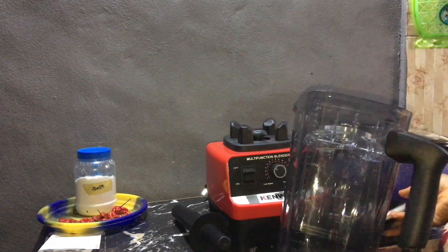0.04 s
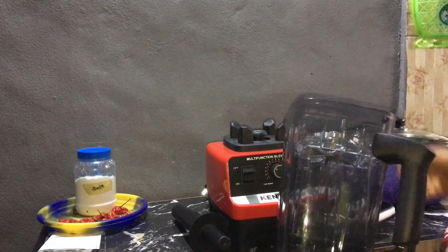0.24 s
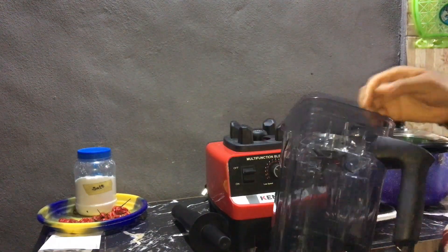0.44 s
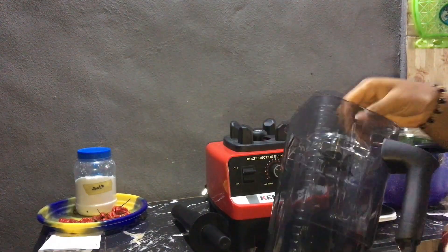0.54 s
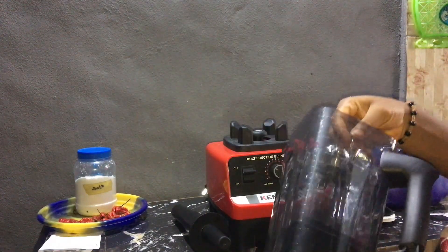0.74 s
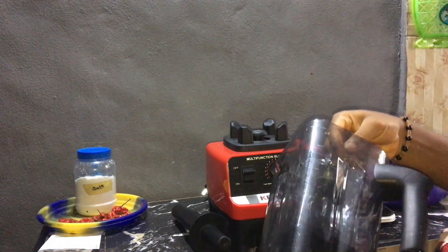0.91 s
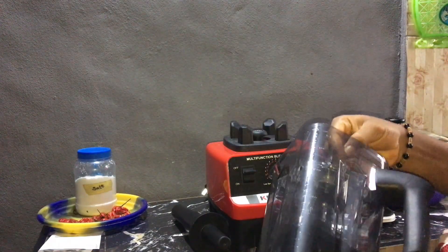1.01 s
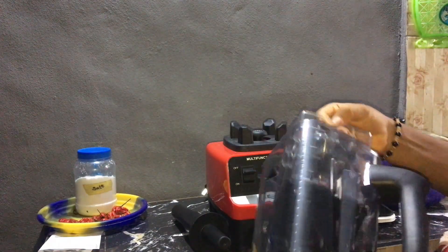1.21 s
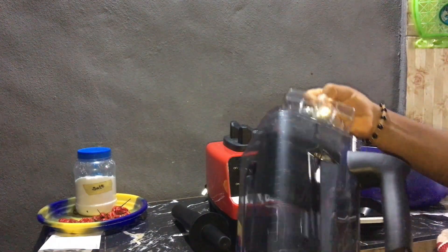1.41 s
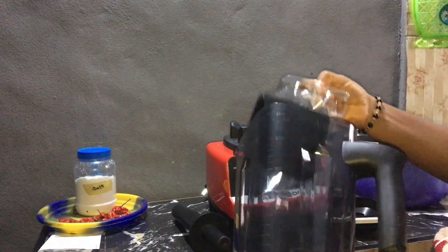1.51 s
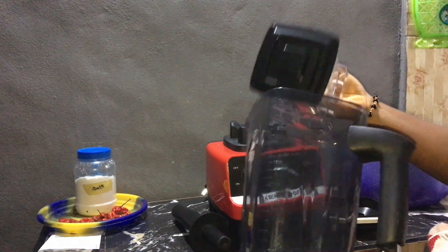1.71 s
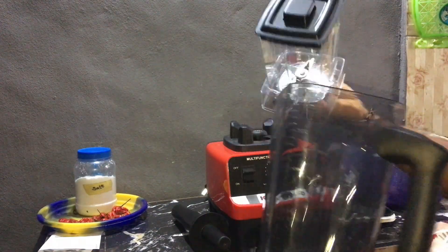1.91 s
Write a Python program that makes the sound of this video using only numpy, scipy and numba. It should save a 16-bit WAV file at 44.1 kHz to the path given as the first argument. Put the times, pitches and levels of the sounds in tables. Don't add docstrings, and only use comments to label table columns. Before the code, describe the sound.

A plastic blender jug is tapped and rubbed, then its lid snaps off and bumps the rim

```python
import sys
import numpy as np
from scipy import signal
from scipy.fft import rfft, irfft
from scipy.io import wavfile
from scipy.ndimage import uniform_filter1d, minimum_filter1d
from numba import njit

SR = 44100
rng = np.random.default_rng(int(sys.argv[2]) if len(sys.argv) > 2 else 0)


def persist_wave(psi):
    counts = np.round(np.clip(psi, -1, 1) * 32767).astype(np.int16)
    wavfile.write(sys.argv[1], SR, np.atleast_2d(counts).T)


def how_loud(loudness_db):
    steps = np.asarray(loudness_db, float) / 20
    return 10 ** steps


N = 85995
LEAD_IN = 8820
TIME = (np.arange(N + LEAD_IN) - LEAD_IN) / SR


def rms_one(x):
    return x / np.sqrt(np.mean(x ** 2) + 1e-20)


def at_hz(points, hz):
    table_hz, value = np.transpose(points)
    return np.interp(np.log(hz), np.log(table_hz), value)


def coloured(spectrum, size):
    hz = np.maximum(np.fft.rfftfreq(size, 1 / SR), 1)
    octaves_below = np.maximum(np.log2(spectrum[0][0] / hz), 0)
    white = rfft(rng.standard_normal(size))
    return rms_one(irfft(white * how_loud(at_hz(spectrum, hz) - 10 * octaves_below), size))


def dulled(x, hz):
    return signal.sosfilt(signal.butter(2, hz, fs=SR, output="sos"), x)


def ring(clicks, hz, t60):
    r, w = how_loud(-60 / (t60 * SR)), 2 * np.pi * hz / SR
    return signal.lfilter([0, np.sin(w)], [1, -2 * r * np.cos(w), r * r], clicks + 1e-18)


# (frequency [Hz], level [dB per Hz])
PLASTIC_CRACK = [(500, 14.5), (2000, 4), (4000, -3), (8000, -17.5), (16000, -48)]


def blows(events, high, low, rattle, high_db, low_db):
    crack_db, crack_s, rattle_s = 5, 0.0032, 0.015
    spread_db, detune = 2.5, .008
    focus_db_per_octave, thump_rise_s = 32, .0035
    out, crack = np.zeros(N + LEAD_IN + SR), coloured(PLASTIC_CRACK, size=SR)
    t = np.arange(SR // 2) / SR
    for s, click_db, bright_hz, thump_db, centre_hz in events:
        level_luck, pitch_luck = rng.standard_normal((2, 14))
        start = int(rng.random() * len(t))
        click = how_loud(crack_db) * crack[start:start + len(t)] * np.exp(-t / crack_s) / 2
        push = rattle * rng.standard_normal(len(t)) * np.exp(-t / rattle_s) / np.sqrt(rattle_s * SR / 2)
        push[0] = 1
        for (hz, db, t60), z, d in zip(high, level_luck, pitch_luck):
            click += how_loud(high_db + db + spread_db * z) * ring(push, hz * (1 + detune * d), t60)
        click = dulled(click, min(bright_hz, 15000))
        thump = np.zeros(len(t))
        for (hz, db, t60), phase in zip(low, pitch_luck):
            mode_db = low_db + db - focus_db_per_octave * abs(np.log2(hz / centre_hz))
            thump += how_loud(mode_db - 60 * t / t60) * np.sin(2 * np.pi * hz * t + phase)
        thump *= (1 - np.exp(-t / thump_rise_s)) ** 2
        i = int(s * SR) + LEAD_IN
        out[i:i + len(t)] += how_loud(click_db) * click + how_loud(thump_db) * thump
    return out[:N + LEAD_IN]


# (time [s], click level [dB], brightness [Hz], thump level [dB], thump centre [Hz])
EARLIER_BLOWS = [
    (-.1, -14.5, 6900, -25, 320),
    (-.02, -29, 5040, -34, 120),
    (.105, -32.5, 5100, -42, 400),
]
# (frequency [Hz], level [dB], t60 [s])
CUTTER_MODES = [(870, -11, 0.036), (1545, -24, 0.026), (2200, -6.5, 0.037), (2300, -4, 0.087),
                (2368, -2, 0.16), (5850, -6, 0.042)]
# (frequency [Hz], level [dB], t60 [s])
CLOSED_LOW_MODES = [(194, -18, 0.05), (221, -1, 0.057), (318, -13, 0.14), (410, -3, 0.05),
                    (476, -14.5, 0.089), (593, -9, 0.037)]


def earlier_clatter():
    return blows(EARLIER_BLOWS, CUTTER_MODES, CLOSED_LOW_MODES, rattle=1.0, high_db=-2.5, low_db=3)


# (start [s], length [s], level [dB], brightness [Hz])
DRAGS = [
    (-.1, 0.26, -35.5, 12000),
    (0.081, 0.19, -41, 12000),
    (0.583, 0.27, -34, 4000),
    (0.753, 0.18, -29, 4000),
    (1.093, 0.14, -24.5, 15000),
    (1.323, 0.11, -22.5, 3040),
    (1.41, 0.18, -34, 4000),
]


def scrapes():
    out = np.zeros(N + LEAD_IN)
    for s, length, db, bright_hz in DRAGS:
        grit = coloured(PLASTIC_CRACK, size=N + LEAD_IN + 1)[:N + LEAD_IN]
        grit = dulled(grit, min(bright_hz, 15000))
        progress = np.clip((TIME - s) / length, 0, 1)
        out += how_loud(db) * grit * np.sin(np.pi * progress ** .5) ** 2
    return out


@njit
def moving_resonance(x, hz, r, sr):
    y = np.zeros(len(x))
    for i in range(2, len(x)):
        y[i] = x[i] - x[i - 2] + 2 * r * np.cos(2 * np.pi * hz[i] / sr) * y[i - 1] - r * r * y[i - 2]
    return y


# (time [s], level [dB], column pitch [Hz])
GRIP_PATH = [(0, -28, 221), (.1, -40.5, 221), (.22, -30.5, 221), (0.269, -24, 221), (.36, -34, 221),
             (.5, -24.5, 221), (.56, -20.5, 221), (.64, -33.5, 221), (0.791, -19.5, 221), (0.949, -43, 221),
             (1.09, -46, 242), (1.13, -20.5, 262), (1.302, -25.5, 262), (1.38, -15.5, 267.3),
             (1.52, -33.5, 298), (1.6, -31, 280.6), (1.7, -30.5, 307), (1.95, -51.5, 283)]
# (frequency [Hz], level [dB], t60 [s])
WALL_MODES = [(915, -2, 0.026), (1143, -1, 0.022), (1270, -11.5, 0.021), (1570, -7.5, 0.019),
              (1820, -2.5, 0.013), (2134, -1, 0.014), (2390, -0.5, 0.016), (2975, -3.5, 0.018),
              (3226, -5, 0.02), (4200, -21, .006), (6330, -8.5, .01)]
# (frequency [Hz], level [dB], t60 [s])
OPEN_LOW_MODES = [(262, 0, 0.11), (298, 2.5, 0.15), (340, 1, 0.12), (389.7, 3.5, 0.17), (500, -6, 0.16),
                  (609, -8, .1), (666, -5, 0.18)]


def rubbing():
    clicks_per_s, soft_hz, column_width_hz, even_s = 2500, 2500, 9, .02
    body_db, wall_db = -5.5, -17.5
    s, db, hz = np.transpose(GRIP_PATH)
    slips = (rng.random(len(TIME)) < clicks_per_s / SR) * rng.standard_normal(len(TIME))
    slips = slips * how_loud(0.92 * np.minimum(rng.exponential(1, len(TIME)), 3))
    slips = dulled(slips, soft_hz)
    pitch, r = np.interp(TIME, s, hz), np.exp(-np.pi * column_width_hz / SR)
    column = moving_resonance(slips, pitch, r, SR)
    column = rms_one(moving_resonance(column, pitch, r ** 4, SR))
    swell = np.sqrt(uniform_filter1d(column ** 2, size=int(even_s * SR)) + 1e-9)
    column = rms_one(column / (swell + 0.12))

    def stirred(modes):
        return rms_one(sum(how_loud(d) * ring(slips, f, t60) for f, d, t60 in modes))

    opened = TIME > LOOSENING[0][0]
    body = np.where(opened, stirred(OPEN_LOW_MODES), stirred(CLOSED_LOW_MODES))
    mix = column + how_loud(body_db) * body + how_loud(wall_db) * stirred(WALL_MODES)
    return how_loud(np.interp(TIME, s, db)) * mix


# (frequency [Hz], level [dB per Hz]), and its overall level [dB]
AIR, AIR_DB = [(88, -53), (150, -23.5), (329, -2), (738, -18.5), (1140, -27), (1410, -21.5), (14400, -54.5),
               (16500, -63)], -35.5
# (frequency [Hz], level [dB per Hz]), and its overall level [dB]
HUM, HUM_DB = [(30, -45), (55, 7), (80, -1.5), (120, 6.5), (160, -1), (300, -14), (600, -99)], -35


def background():
    drop_db, drop_at_s, drop_s = -7.5, 1.21, 0.1
    air = how_loud(AIR_DB) * coloured(AIR, size=N + 1)[:N]
    hum = how_loud(HUM_DB) * coloured(HUM, size=N + 1)[:N]
    return (air + hum) * how_loud(drop_db * np.clip((np.arange(N) / SR - drop_at_s) / drop_s, 0, 1))


# (time [s], click level [dB], brightness [Hz], thump level [dB], thump centre [Hz])
FINGER_TAPS = [(.117, -43.5, 1500, -11.5, 448), (.24, -50.5, 1500, -12.5, 221),
               (.283, -47, 1500, -19.5, 221), (.408, -24.5, 2800, -9, 223), (.43, -48, 1500, -15, 430),
               (.48, -27, 2500, -31, 221), (.5317, -24, 4000, -15.5, 221), (.55, -41.5, 1420, -8.5, 455),
               (.588, -23.5, 2000, -7, 221), (.6065, -16, 7450, -17.5, 410), (.615, -26.5, 3500, -34, 410),
               (.63, -21.5, 4940, -12.5, 410), (.672, -23.5, 1800, -9, 410), (.7063, -22, 3000, -12.5, 263),
               (.7472, -16, 5000, -5.5, 221), (.77, -23.5, 3000, -7, 402), (1.0066, -38, 3030, -37, 350)]


def taps():
    return blows(FINGER_TAPS, WALL_MODES, CLOSED_LOW_MODES, rattle=2.14, high_db=-13.5, low_db=4.0)


# (time [s], click level [dB], brightness [Hz], thump level [dB], thump centre [Hz])
LID_KNOCKS = [
    (.8035, -16, 8130, -15.5, 331),
    (.806, -16.5, 5000, 4.5, 304),
    (.837, -40.5, 2500, -7, 221),
    (.875, -39, 2000, -7.5, 221),
]
# (frequency [Hz], level [dB], t60 [s])
LID_MODES = [(803, 4, 0.25), (880, 9, 0.16), (954, -7, .06), (1087, 2, 0.22), (1162, 2.5, 0.065),
             (1213, 7, 0.068), (1265, 14, 0.052), (1340, 0.5, 0.084), (1560, -13.5, 0.048),
             (1782, 6.5, .03), (1914, -3.5, 0.024), (2260, -14.5, 0.018), (3300, -5.5, 0.023)]
# (frequency [Hz], level [dB], t60 [s])
LID_LOW_MODES = [(221, 2, 0.21), (268, -6, 0.21), (350, -5, 0.46), (450.3, 10, 0.27), (525, 3.5, 1)]


def knock():
    return blows(LID_KNOCKS, LID_MODES, LID_LOW_MODES, rattle=0.36, high_db=-9, low_db=-8.5)


# (time [s], click level [dB], brightness [Hz], thump level [dB], thump centre [Hz])
LOOSENING = [
    (1.0965, -11, 13000, -38, 800),
    (1.0995, -3.5, 6000, 2.5, 297),
    (1.1308, -4.5, 3000, -3.5, 335),
    (1.134, -12, 2500, -5.5, 518),
    (1.1525, -2.5, 13000, -2, 510),
    (1.1777, -8.5, 2500, -13.5, 650),
    (1.2, -41.5, 1490, -13.5, 600),
    (1.225, -20, 2300, -12, 507),
    (1.30, -21.5, 7040, -15.5, 483),
]
# (frequency [Hz], level [dB], t60 [s])
RIM_MODES = [(850, -9, 0.054), (1065, -1, 0.012), (1220, 0.5, 0.035), (1472, -8, 0.033), (1610, -11, 0.026),
             (1955, 6, 0.02), (2262, 0.5, 0.033), (3440, 2, 0.011), (3890, -2.5, 0.0092),
             (5100, -17, 0.004), (6500, -23, 0.0036)]
# (frequency [Hz], level [dB], t60 [s])
RIM_LOW_MODES = [(262, -3, 0.18), (350, -1.5, 0.11), (415, 0, 0.12), (500.5, 6, 0.11), (600, 1.5, 0.14),
                 (680.4, 3, 0.12), (960, -17, 0.068)]


def clatter():
    return blows(LOOSENING, RIM_MODES, RIM_LOW_MODES, rattle=1.06, high_db=-13.5, low_db=0.0)


# (time [s], click level [dB], brightness [Hz], thump level [dB], thump centre [Hz])
TAB_FLICK = [
    (1.267, -15.5, 1800, -32, 505),
]
# (frequency [Hz], level [dB], t60 [s])
TAB_MODES = [(1060, -0.5, 0.036), (1180, 0.5, 0.072)]


def flick():
    return blows(TAB_FLICK, TAB_MODES, RIM_LOW_MODES, rattle=0.27, high_db=0.5, low_db=-10)


# (time [s], click level [dB], brightness [Hz], thump level [dB], thump centre [Hz])
LID_BUMPS = [(1.328, -18, 5100, -2.5, 500), (1.343, -18, 1780, -0.5, 265), (1.36, -12, 2500, -3.5, 398),
             (1.385, -19.5, 2200, 0.5, 500), (1.405, -18, 2000, -11.5, 290), (1.434, -12, 6500, -7, 395),
             (1.457, -27.5, 5740, 0.5, 370), (1.479, -20, 4000, -9.5, 380), (1.495, -38, 1990, -6, 295),
             (1.508, -43, 1500, -4.5, 295), (1.537, -28, 2500, -10.5, 330), (1.556, -29, 2500, -11.5, 395),
             (1.578, -25, 1960, -17, 351), (1.601, -31, 3000, -34, 290), (1.6157, -24, 8860, -11, 395),
             (1.636, -40, 1500, -10.5, 415), (1.69, -43, 1500, -16.5, 500)]
# (frequency [Hz], level [dB], t60 [s])
OPEN_RIM_MODES = [(890, -11.5, .04), (1096, 7.5, 0.016), (1250, -6.5, .03), (1456, 1.5, 0.036),
                  (1603, -1.5, 0.041), (1915, 4, 0.02), (2300, -7, .03), (2960, -11, .014),
                  (4000, -17, 0.0086), (6000, -25, 0.0054)]


def bumps():
    return blows(LID_BUMPS, OPEN_RIM_MODES, OPEN_LOW_MODES, rattle=1.23, high_db=-13.0, low_db=-1)


# (frequency [Hz], t60 [s])
ROOM_DECAY = [(100, 0.89), (400, 0.66), (1500, 0.62), (4000, 0.31), (12000, 0.35)]


def room(x):
    level_db, gap_s, bass_db, bass_hz = -4.5, 0.0048, -6, 450
    t = np.arange(SR * 3 // 4) / SR
    edges = 60 * 2. ** np.arange(9)
    tail = np.zeros(len(t))
    for lo, hi in zip(edges, edges[1:]):
        octave = signal.butter(2, [lo, hi], "band", fs=SR, output="sos")
        band = signal.sosfilt(octave, rng.standard_normal(len(t)))
        tail += band * how_loud(bass_db * (lo < bass_hz) - 60 * t / at_hz(ROOM_DECAY, np.sqrt(lo * hi)))
    tail *= np.clip(t / gap_s - 1, 0, 1) / np.sqrt(1.07 * np.sum(tail ** 2))
    return how_loud(level_db) * signal.fftconvolve(x, tail)[:len(x)]


def scene():
    jug = rubbing() + scrapes() + earlier_clatter() + taps() + knock() + clatter() + flick() + bumps()
    jug = signal.sosfilt(signal.butter(4, 113, "high", fs=SR, output="sos"), jug)
    behind = background()
    handled = (jug + room(jug))[LEAD_IN:]
    hiss = how_loud(-64) * rng.standard_normal(N)
    return (handled + behind + hiss)[None]


def roll_off(x):
    return signal.sosfilt(signal.butter(12, 16540, fs=SR, output="sos"), x)


def record(dry):
    limit_db, release_db_per_s = -.2, 250
    over = np.maximum(20 * np.log10(np.abs(dry[0]) + 1e-9) - limit_db, 0)
    slope = release_db_per_s * np.arange(N) / SR
    held = np.maximum.accumulate(over + slope) - slope
    cut = -minimum_filter1d(-held, size=89)
    limited = dry * how_loud(-uniform_filter1d(np.maximum(cut, 0), size=45))
    return roll_off(limited)


dry = scene()
out = record(dry)
persist_wave(out)
```